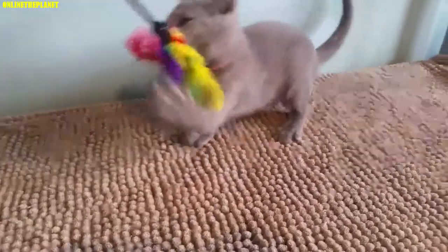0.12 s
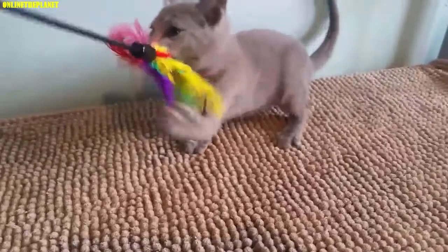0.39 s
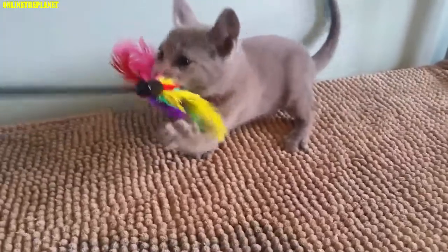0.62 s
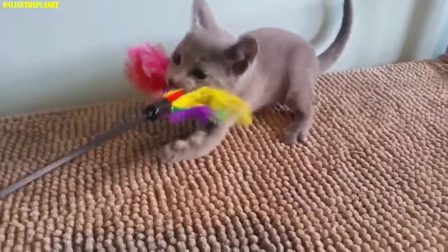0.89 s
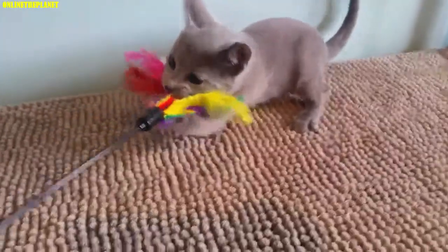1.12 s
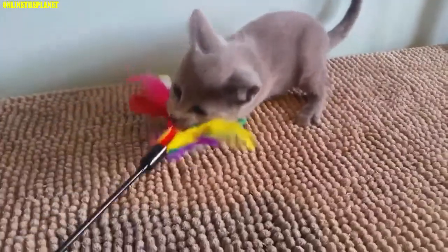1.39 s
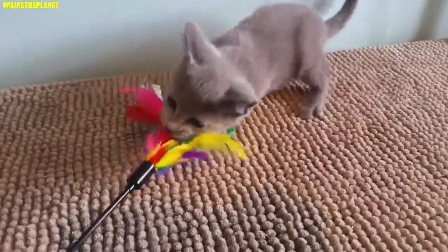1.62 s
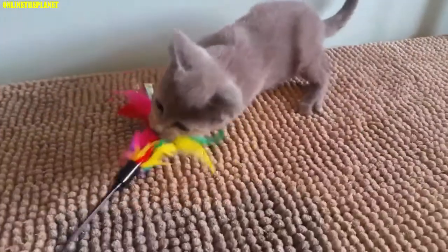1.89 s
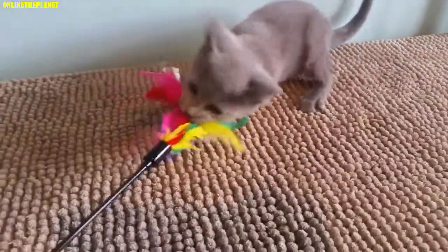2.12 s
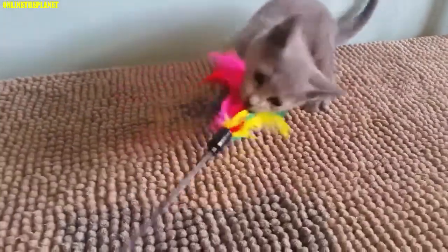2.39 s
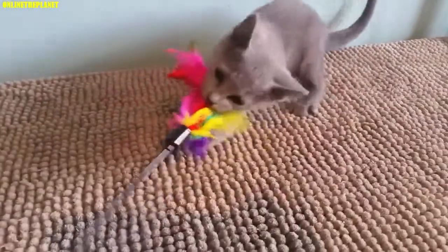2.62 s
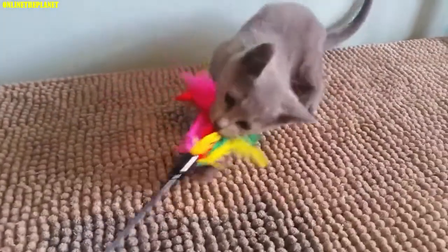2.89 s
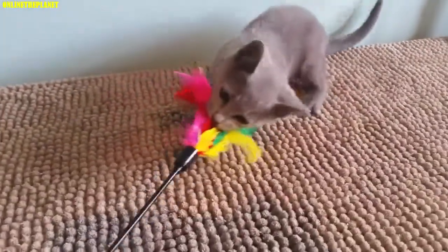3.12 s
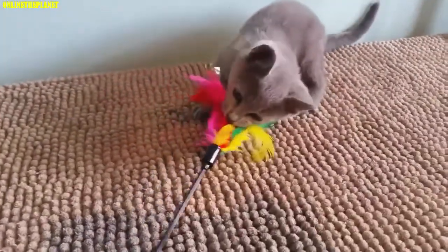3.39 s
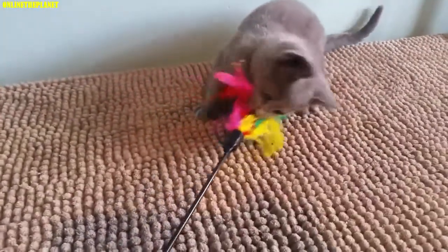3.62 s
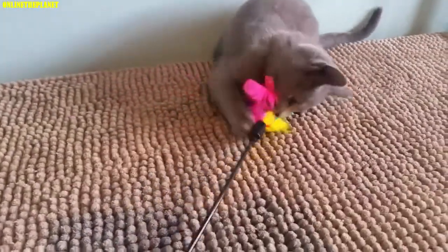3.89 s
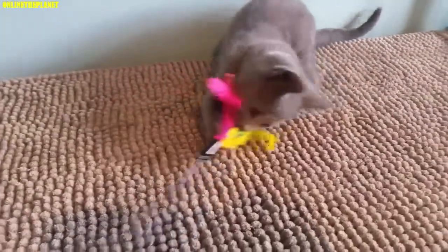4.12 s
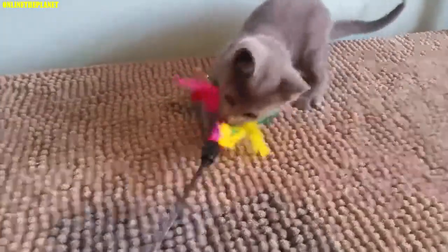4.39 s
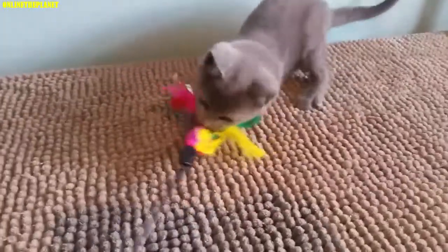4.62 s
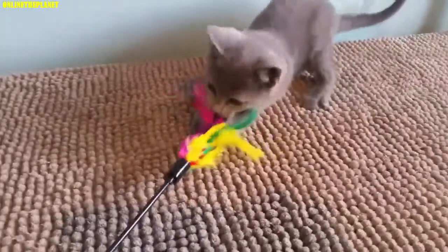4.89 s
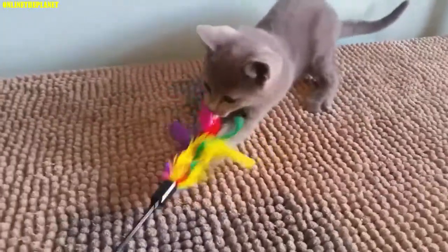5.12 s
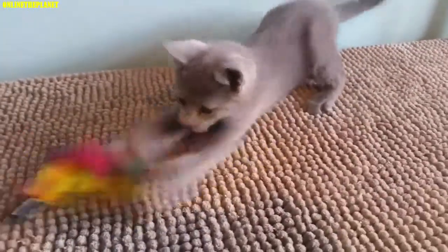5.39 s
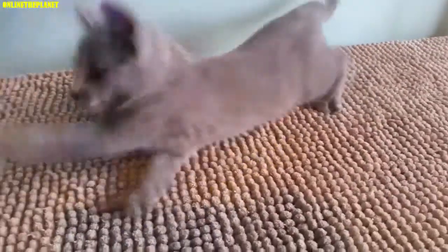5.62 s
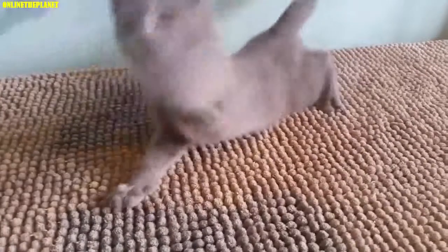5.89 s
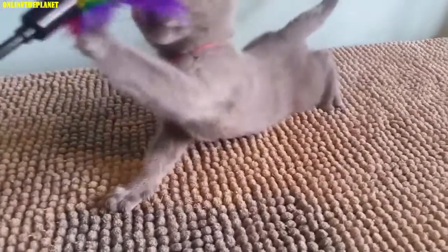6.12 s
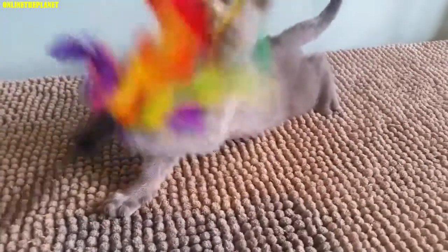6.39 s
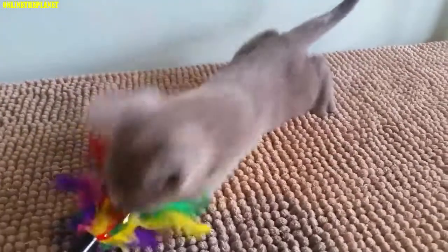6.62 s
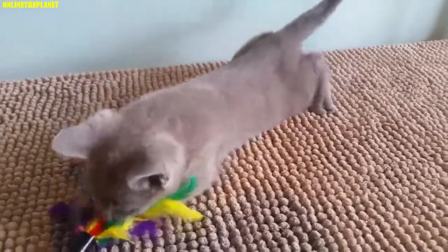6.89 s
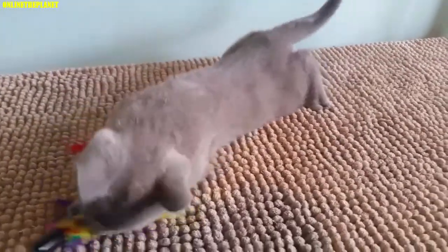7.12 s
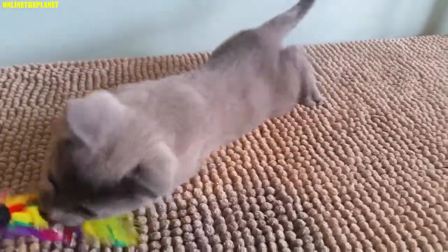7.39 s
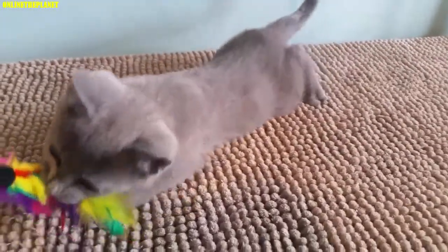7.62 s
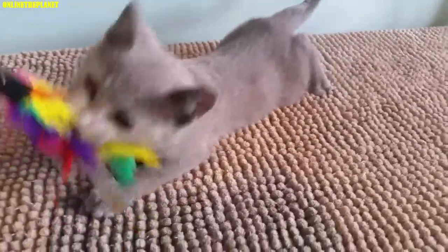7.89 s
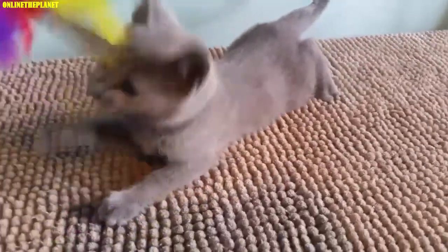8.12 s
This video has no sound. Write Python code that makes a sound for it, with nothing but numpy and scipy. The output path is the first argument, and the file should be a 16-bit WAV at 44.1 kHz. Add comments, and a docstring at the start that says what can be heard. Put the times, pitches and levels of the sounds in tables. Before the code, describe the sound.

A kitten plays with a feather wand on a nubby mat, heard very close in stereo in a small room. Bright claw and quill snaps with dry, crackly rustling come in scattered clusters, quiet in the middle, then a strong scramble past five seconds. Soft paw thuds follow, and the wand knocks twice near the end. A faint wavering hum and thin hiss, stronger at left, lie underneath.

```python
"""A kitten tugs at a feather wand on a knobbly mat, close to two microphones in a small room.
Claws and quills snap and rustle: short envelopes and random slips shape noise coloured as fibres, quills and mat.
Paws thud on the floor and the wand's stiff end knocks: soft pushes ring a few damped modes.
A decaying noise tail gives the room's answer. Filtered noise makes the room tone, the wavering low hum,
the body's shuffling and a narrow hiss that is strongest at the left microphone."""
import sys
import numpy as np
from scipy import signal
from scipy.fft import rfft, irfft, next_fast_len
from scipy.io import wavfile
from scipy.ndimage import map_coordinates

SR = 44100
rng = np.random.default_rng(int(sys.argv[2]) if len(sys.argv) > 2 else 0)


def wav_out(sig):
    """Save sig, one row per channel (or a flat mono array), as 16-bit PCM at SR to the path in sys.argv[1]."""
    wavfile.write(sys.argv[1], SR, np.round(np.clip(np.atleast_2d(sig).T, -1, 1) * 32767).astype(np.int16))


def elevation(decibels):
    """Turn decibel levels (scalar or array-like) into linear amplitude ratios."""
    levels = np.asarray(decibels, float)
    return 10 ** (levels / 20)


N = 364266


def unit(x):
    """Normalisation to unit mean power: the rms becomes 1."""
    return x / np.sqrt(np.mean(x ** 2) + 1e-20)


def along(points, hz):
    """Interpolation of (Hz, value) points on a logarithmic frequency axis."""
    f, v = np.transpose(points)
    return np.interp(np.log(hz + 1), np.log(f + 1), v)


def curves(rows):
    """Linear interpolation in time: one value per sample for each column after the time."""
    s, *cols = np.transpose(rows)
    return [np.interp(np.arange(N) / SR, s, c) for c in cols]


def wobble(rate):
    """Slow random modulation: a smooth curve through random knots, rate of them a second."""
    knots = rng.standard_normal(int(N * rate / SR) + 4)
    return map_coordinates(knots, [np.arange(N) * rate / SR])


def filtered(x, response):
    """Linear filtering: the spectrum of x is multiplied by a response of frequency."""
    m = next_fast_len(N + SR // 2)
    return irfft(rfft(x, m) * response(np.fft.rfftfreq(m, 1 / SR)), m)[..., :N]


def coloured(x, spectrum):
    """Spectral shaping with a response of unit rms, which keeps the power of white noise."""
    return filtered(x, lambda hz: unit(elevation(along(spectrum, hz))))


def sides(db):
    """Interchannel level difference: left and right gains, positive db to the left."""
    return elevation(np.array([db / 2, -db / 2]))


def rush(gain):
    """Diffuse-field coherence: stereo noise of rms 1, alike in the bass and unrelated in the treble."""
    # left-right likeness: freq_hz, correlation
    alike = [(30, .5), (60, .65), (140, .75), (220, .8), (400, .6), (800, .25), (2000, .1)]
    turn = lambda hz: np.arccos(np.clip(along(alike, hz), -1, 1)) / 2
    mid_side = lambda hz: gain(hz) * [np.cos(turn(hz)), np.sin(turn(hz))]
    mid, side = filtered(rng.standard_normal((2, N)), mid_side)
    return unit(np.array([mid + side, mid - side]))


def room_tone():
    """Stationary ambient noise: a steady spectrum, a little stronger on the left."""
    # spectrum of the room tone: freq_hz, relative_db
    air = [(20, -11), (45, -10), (95, -0.5), (190, -5.5), (330, -18.5), (700, -26), (2100, -41),
           (5700, -57), (8000, -31), (10000, -53), (12500, -34.5), (15500, -54.5)]
    return elevation(-62) * rush(lambda hz: elevation(along(air, hz))) * sides(3)[:, None]


def hum():
    """Narrow-band noise: two resonance-shaped low bands whose levels waver at random."""
    # course of the hum's level, before its wavering: time_s, low_tone_db, upper_tone_db
    hum_levels = [(0.0, -74, -65), (0.66, -63, -59), (1.1, -66, -57), (1.5, -60, -55), (2.0, -62, -60),
                  (3.2, -68, -59), (3.55, -67, -51), (4.1, -69, -55), (4.5, -68, -60), (5.15, -65, -49),
                  (5.5, -61, -55), (6.1, -62, -61), (6.3, -62, -53), (6.75, -62, -48), (6.9, -61, -56),
                  (7.2, -59, -53), (7.7, -69, -56), (8.0, -62, -55), (8.26, -61, -58)]
    # bands of the hum: centre_hz, width_at_half_amplitude_hz
    tones = [(62, 19), (138, 29.4)]
    out = np.zeros((2, N))
    for db, (hz, width) in zip(curves(hum_levels), tones):
        band = rush(lambda f: 1 / (1 + (2 * (f - hz) / width) ** 2))
        out += elevation(db + 1.9 * wobble(8.3)) * band
    return out


def shuffling():
    """Friction noise of the body shifting on the mat: a low noise band, modulated in level."""
    # spectrum of the shuffling: freq_hz, relative_db
    shuffle_spectrum = [(120, -25), (220, 0), (450, -10), (900, -29)]
    # course of its level, before the random modulation: time_s, level_db
    shuffle_levels = [(0.0, -71), (0.5, -69), (1.1, -64.5), (1.7, -65), (2.3, -68), (3.2, -71.5),
                      (3.65, -66), (4.3, -69), (4.9, -66), (5.05, -61), (5.2, -65), (5.5, -59), (5.75, -63),
                      (6.1, -59), (6.3, -65), (6.8, -58.5), (7.1, -61), (7.4, -58), (7.7, -67), (7.95, -57),
                      (8.26, -60)]
    level_db = curves(shuffle_levels)[0] + 1.67 * wobble(15)
    return elevation(level_db) * rush(lambda hz: elevation(along(shuffle_spectrum, hz)))


def hiss():
    """Band noise, incoherent between the microphones and far stronger at the left one."""
    # spectrum of the hiss: freq_hz, relative_db
    hiss_spectrum = [(1940, -34), (3300, -38), (3560, -10.5), (3990, 0), (4260, -4), (4540, -4.5),
                     (4920, -8.5), (5500, -30), (7150, -89), (12100, -120)]
    # course of its level, before the offset of each microphone: time_s, level_db
    hiss_levels = [(0.0, -62.5), (8.26, -58.5)]
    noise = coloured(rng.standard_normal((2, N)), [(3000, -120)] + list(hiss_spectrum) + [(6200, -120)])
    microphone_db = np.array([[5], [-11]])
    return elevation(curves(hiss_levels)[0] + .7 * wobble(3.38) + microphone_db) * noise


def strokes():
    """Incoherent addition: strokes swell and fade evenly in dB, and overlapping ones add their power."""
    # strokes of paws and feathers over the mat: peak_time_s, envelope_peak_db,
    # swell_s and fade_s (time to rise or fall by 30 dB)
    stroke_rows = [(0.084, -70, .05, .09), (0.376, -59, .02, .17), (0.5, -73, .3, .3),
                   (0.59, -54, .015, .15), (0.8, -74, .4, .4), (0.94, -64, .011, .2), (1.037, -50, .07, .3),
                   (1.076, -49, .1, .4), (1.128, -36, .02, .05), (1.142, -44, .02, .21),
                   (1.24, -59, .08, .1), (1.316, -61, .04, .11), (1.456, -49, .005, .11),
                   (1.6, -47, .02, .045), (1.662, -47, .004, .08), (1.69, -50, .05, .08),
                   (1.72, -44, .015, .06), (1.772, -47, .005, .1), (1.823, -47, .006, .02),
                   (1.885, -56, .09, .12), (2.05, -57, .065, .13), (2.108, -59, .06, .09),
                   (2.25, -69, .15, .3), (2.404, -61, .03, .025), (2.444, -48, .004, .12),
                   (2.626, -60, .08, .2), (2.76, -73, .2, .4), (3.07, -73, .035, .09), (3.12, -66, .05, .3),
                   (3.404, -67, .04, .15), (3.554, -65, .04, .1), (3.72, -70, .09, .5),
                   (3.964, -67, .1, .1), (4.03, -68, .05, .2), (4.098, -41, .006, .03),
                   (4.13, -55, .08, .1), (4.175, -57, .04, .22), (4.44, -63, .05, .2), (4.55, -66, .3, .1),
                   (4.575, -45, .005, .025), (4.584, -55, .011, .18), (4.648, -48, .005, .06),
                   (4.78, -64, .12, .3), (4.934, -53, .008, .07), (5.006, -40.5, .07, .25),
                   (5.064, -45, .2, .16), (5.221, -43, .006, .15), (5.31, -49, .06, .25),
                   (5.377, -28, .013, .04), (5.437, -36, .016, .25), (5.485, -37, .1, .15),
                   (5.53, -37, .12, .07), (5.668, -56, .04, .08), (5.792, -56, .07, .2),
                   (5.938, -43, .03, .03), (5.952, -54, .011, .15), (6.035, -50, .03, .3),
                   (6.076, -43, .02, .12), (6.552, -53.5, .06, .3), (6.6, -53, .1, .2),
                   (6.65, -45, .1, .12), (6.712, -42, .006, .1), (6.726, -42, .02, .12),
                   (6.776, -39, .006, .12), (6.806, -40, .03, .1), (6.834, -39, .05, .03),
                   (6.9, -58, .2, .15), (7.004, -44, .006, .03), (7.03, -54, .05, .45),
                   (7.158, -45, .06, .12), (7.24, -51, .07, .4), (7.325, -47, .3, .07),
                   (7.373, -42, .06, .14), (7.437, -47, .1, .15), (7.551, -45, .005, .09),
                   (7.62, -63, .1, .8), (7.806, -56.5, .06, .6), (7.94, -54, .15, .1),
                   (8.024, -42, .004, .025), (8.064, -44, .027, .4), (8.122, -35, .014, .05),
                   (8.138, -32, .006, .25), (8.165, -35, .08, .1), (8.185, -37, .06, .16)]
    rest_db, fade_db = -83, 30  # a faint rustle never stops
    t, power = np.arange(N) / SR, np.full(N, elevation(rest_db) ** 2)
    for s, db, swell, fade in stroke_rows:
        near = slice(max(round((s - 2 * swell) * SR), 0), round((s + 2 * fade) * SR))
        away = np.where(t[near] < s, (s - t[near]) / swell, (t[near] - s) / fade)
        power[near] += elevation(db - fade_db * away) ** 2
    return power


def scuffle(power):
    """Stick-slip friction: fibres slip in clumps of tiny bursts over a fine rub; the mat backing follows."""
    clump = elevation(3 * wobble(60))
    size = elevation(np.minimum(4 * rng.exponential(size=N), 12))
    slips = (rng.random(N) < 500 / SR * clump) * size  # about 500 a second
    burst = elevation(-60 * np.arange(300) / SR / .0018)  # falls 60 dB in 1.8 ms
    grain = unit(signal.fftconvolve(slips, burst)[:N])
    rub = unit(.75 * grain + elevation(2.5 * wobble(40)))
    rub = rub * np.sqrt(power) * sides(-1.5)[:, None]
    # the backing lies 15.3 dB under a stroke of -50 dB and changes .92 dB per dB of stroke
    stroke_db = 10 * np.log10(power)
    backing_db = -15.3 + (.92 - 1) * (stroke_db + 50)
    return rub, rub * elevation(backing_db)


def snaps():
    """Impulsive release of claws and quills: an envelope with a steep start and exponential decay."""
    # snaps: time_s, envelope_db, dull_part_relative_to_it_db, left_minus_right_db
    snap_rows = [(0.3673, -43.5, -33, -2.0), (0.377, -41, -20, -10), (0.581, -44, -27, -1.0),
                 (0.598, -46, -24, -4.5), (0.629, -47, -14, -3.0), (0.935, -41, -11, 2),
                 (1.035, -31, -14, -8), (1.051, -35, -20, -4), (1.081, -35, -20, -4),
                 (1.1269, -28.5, -21, -4.0), (1.4526, -32, -21, -2.0), (1.5902, -31, -36, -9),
                 (1.6612, -41, -9, -4), (1.716, -45, -17, -3.0), (1.7707, -31.5, -11, 2),
                 (1.8228, -32.5, -27, -2), (2.4004, -50, -10, -1.5), (2.4431, -30, -14, -4.5),
                 (3.7344, -45.5, -17, 3), (4.0901, -46, -20, 1), (4.0982, -30, -15, -15),
                 (4.1605, -31, -17, -8.0), (4.170, -38, -20, -6), (4.4362, -46.5, -31, -3.0),
                 (4.495, -50, -12, 0), (4.52, -50, -8, 0), (4.55, -50, -10, 0), (4.573, -31, -22, -10),
                 (4.648, -27, -17, -3), (4.9342, -42, -19, -5), (4.9721, -38, -19, 1),
                 (4.9995, -36, -19, -4.0), (5.01, -24, -10, -3.5), (5.2195, -33, -21, -18),
                 (5.3098, -41, -26, 1), (5.374, -31, -24, -16), (5.3844, -28, -14, -9),
                 (5.435, -28, -20, -11), (5.4994, -27, -22, -8), (5.6665, -46, -25, -1.5),
                 (5.9189, -46, -22, -8), (5.9373, -30, -22, -6), (6.0207, -48, -21, 0.5),
                 (6.033, -32, -15, -2), (6.0739, -27.5, -20, -6), (6.555, -41, -31, -7),
                 (6.6359, -35, -16, -5), (6.711, -31, -20, -1.0), (6.7249, -26, -26, -9),
                 (6.7769, -26.5, -16.5, -4.5), (6.8047, -28, -25, -5), (6.8296, -27, -17, 5),
                 (6.9895, -48, -24, -0.5), (7.003, -38, -17, 0), (7.1607, -39, -13, -1.0),
                 (7.2265, -43, -20, 1), (7.37, -34, -23, -0.5), (7.434, -34, -19, 3), (7.449, -31, -25, 1),
                 (7.5063, -36.5, -23, 0.0), (7.55, -27, -20, -5), (7.809, -40.5, -18, -1),
                 (7.9239, -43, -15, 1), (7.9942, -43, -15, 0.5), (8.0239, -29, -25, -2),
                 (8.0574, -34, -20, -1.5), (8.0674, -38, -16, -5), (8.1202, -27, -20, -7),
                 (8.136, -28, -9, 1), (8.1784, -24, -13, -4)]
    bright, dull, t = np.zeros((2, N + SR)), np.zeros((2, N + SR)), np.arange(SR // 20) / SR
    rise_s, t60_s = .0002, .0068
    burst = (1 - np.exp(-t / rise_s)) * elevation(-60 * t / t60_s)
    for s, db, dull_db, pan_db in snap_rows:
        shape = elevation(db) * sides(pan_db)[:, None] * burst
        bright[:, round(s * SR):][:, :len(t)] += shape
        dull[:, round(s * SR):][:, :len(t)] += shape * elevation(dull_db)
    return bright[:, :N], dull[:, :N]


def toy():
    """Source-filter principle: stroke and snap envelopes gate noise, which each material colours."""
    # spectra of rubbed fibres, snapping quill and mat backing: freq_hz, relative_db
    fibres = [(2500, -14), (3500, -19), (4500, -3.5), (6000, -7), (8500, -4.5), (12200, 0.5), (15400, 4),
              (16500, -30)]
    quill = [(2500, -25.5), (3500, -5), (4600, 3), (5800, -7), (8500, -6.5), (12200, -0.5), (15400, -3),
             (16500, -13)]
    backing = [(200, -18), (500, -2.5), (1000, -1), (2000, -5.5), (3200, 0), (5000, -18)]
    rub, dull_rub = scuffle(strokes())
    snap, dull_snap = snaps()
    # the two microphones share only part of the fine detail under each burst
    noise = rng.standard_normal((3, 2, N)) + .5 * rng.standard_normal((3, 1, N))
    out = coloured(rub * noise[0], fibres)
    out += coloured(snap * noise[2], quill)
    return out + coloured((dull_rub + dull_snap) * noise[1], backing)


def blows(events, modes, cut_hz):
    """Modal excitation: one soft push rings damped modes; a longer contact leaves out the upper ones."""
    out, t = np.zeros((2, N + SR)), np.arange(SR // 2) / SR
    ring = sum(elevation(db - 60 * t / t60) * np.cos(2 * np.pi * hz * t) for hz, db, t60 in modes)
    bass_cut = signal.butter(2, cut_hz, 'high', fs=SR, output='sos')
    for s, db, contact, pan_db in events:
        push = np.sin(np.pi * np.clip(t[:2000] / max(contact, .0005), 0, 1)) ** 2
        # a bass cut at the microphones: the pressure swings back past zero
        blow = signal.sosfilt(bass_cut, -signal.fftconvolve(ring, push)[:len(t)])
        out[:, round(s * SR):][:, :len(t)] += elevation(db) * blow / np.abs(blow).max() * sides(pan_db)[:, None]
    return out[:, :N]


def thuds():
    """Impact of soft paws: a push of several milliseconds rings the floor's low modes."""
    # paw thuds: time_s, peak_db (before panning), contact_s, left_minus_right_db
    thud_rows = [(1.108, -52, 0.0086, 1), (5.608, -39, 0.0044, 3.5), (5.87, -46, 0.0054, 0),
                 (6.8, -45, 0.012, 2)]
    # modes of the floor: freq_hz, relative_db, t60_s
    floor_modes = [(70.1, 1, 0.35), (150, 5.5, 0.092)]
    return blows(thud_rows, floor_modes, cut_hz=26)


def knocks():
    """Impact of the wand's stiff end: a brief contact also rings the upper modes of what it strikes."""
    # knocks: time_s, peak_db (before panning), contact_s, left_minus_right_db
    knock_rows = [(7.1425, -27, 0.0024, -8.5), (7.9432, -30.5, 0.001, 3)]
    # modes of the struck object: freq_hz, relative_db, t60_s
    board_modes = [(74, 8.5, 0.063), (157, 7, 0.055), (286, -4, 0.017), (444, 5.5, 0.027), (745, 3, 0.04),
                   (930, -3, .05), (1230, -12, .025)]
    return blows(knock_rows, board_modes, cut_hz=52)


def room(x):
    """Reverberation: convolution with a noise tail in which each frequency has its own decay time."""
    # decay of the room: freq_hz, t60_s
    decay = [(300, 0.39), (3000, 0.58), (8000, 0.43), (15000, 0.067)]
    hz, t, z = signal.stft(rng.standard_normal((2, SR // 2)), SR, nperseg=256)
    tail = signal.istft(z * elevation(-60 * t / along(decay, hz)[:, None]), SR, nperseg=256)[1]
    late = np.pad(x, ((0, 0), (250, 0)))  # the tail starts 250 samples after the direct sound
    return signal.fftconvolve(late, tail / np.linalg.norm(tail[0]), axes=1)[:, :N]


def scene():
    """Superposition: direct sounds of kitten and toy, their reverberation and the background."""
    rustle = toy()
    low = thuds() + knocks()
    walls = elevation(-11) * room(rustle) + elevation(-12.5) * room(low)
    background = room_tone() + hum() + shuffling() + hiss()
    return rustle + low + walls + background


def top_cut(x):
    """Nothing passes above the cut-off."""
    return signal.sosfilt(signal.butter(12, 16820, fs=SR, output="sos"), x)


def record(dry):
    """Band limitation: a steep lowpass empties the top of the treble."""
    # steep lowpass: freq_hz, gain_db
    lowpass = [(15600, 0), (16000, -42)]
    mix = filtered(dry, lambda hz: elevation(along(lowpass, hz)))
    return top_cut(mix)


dry = scene()
out = record(dry)
wav_out(out)
```